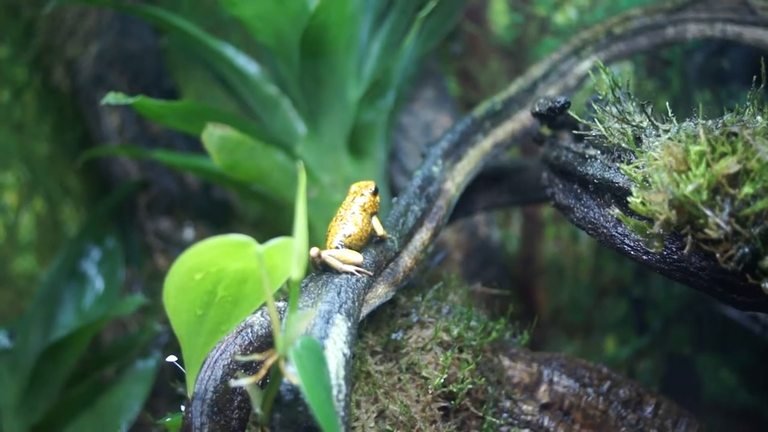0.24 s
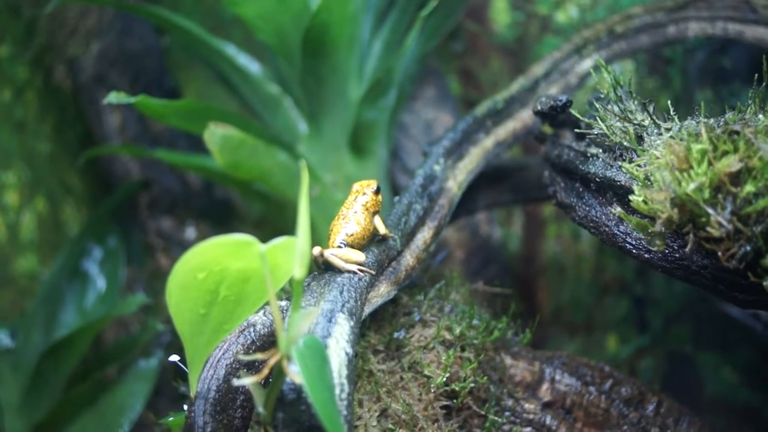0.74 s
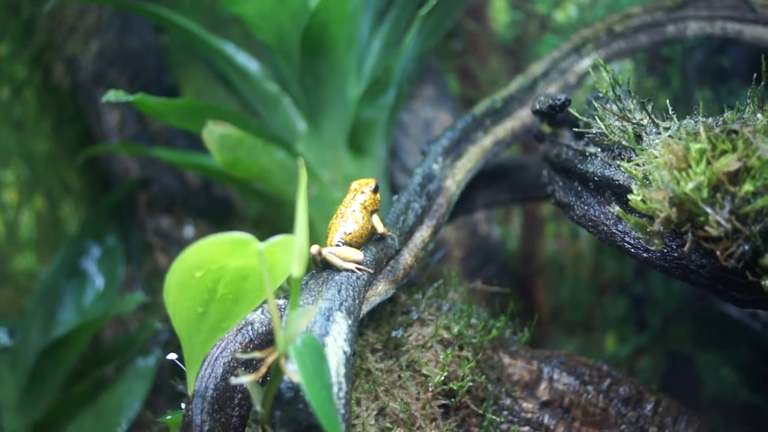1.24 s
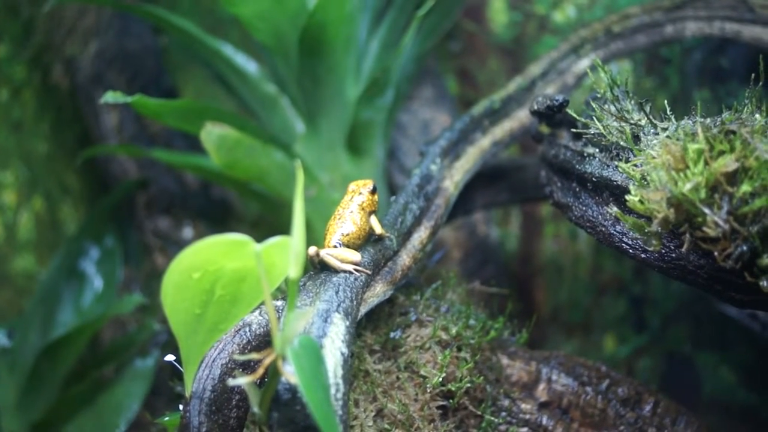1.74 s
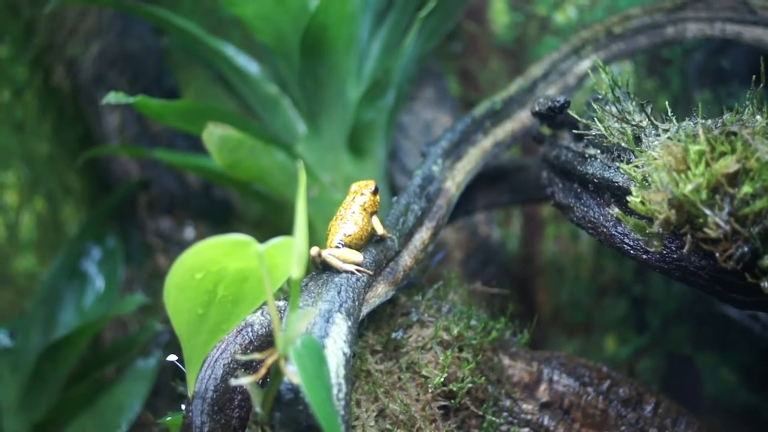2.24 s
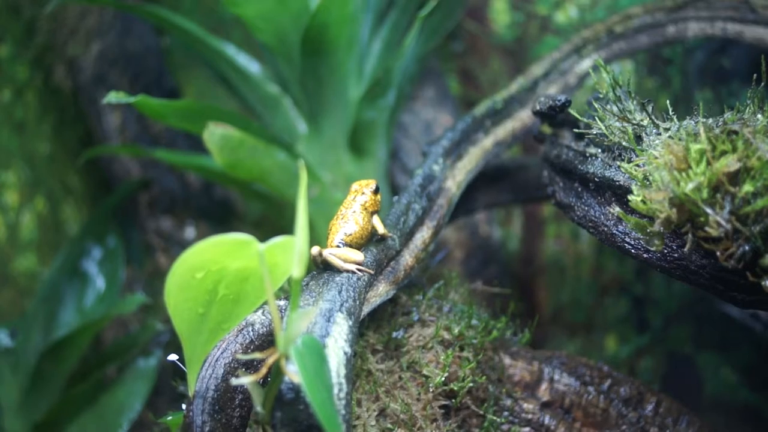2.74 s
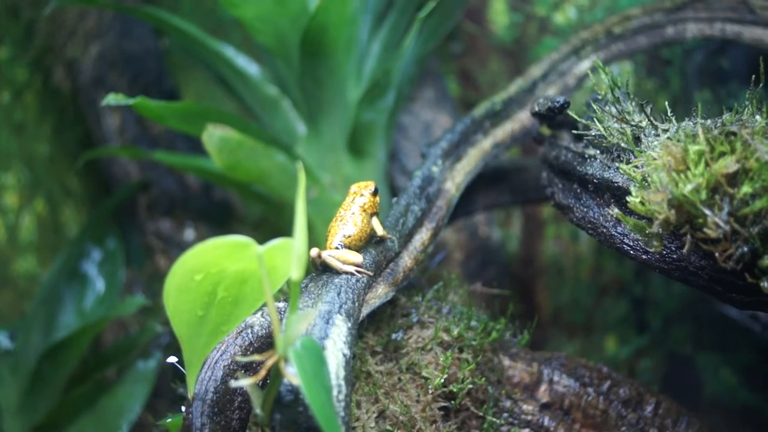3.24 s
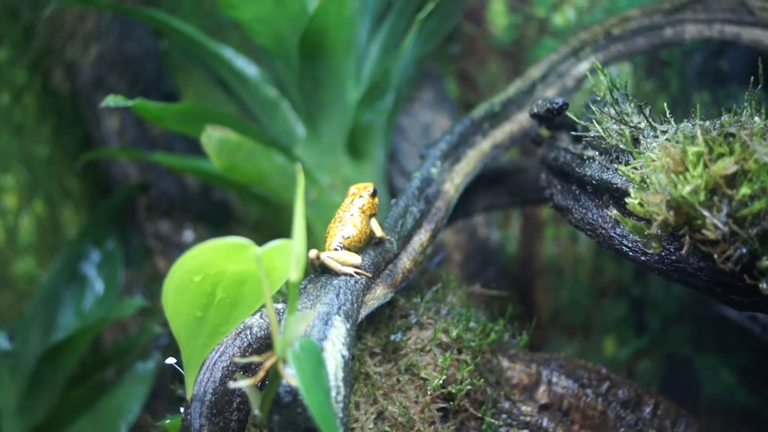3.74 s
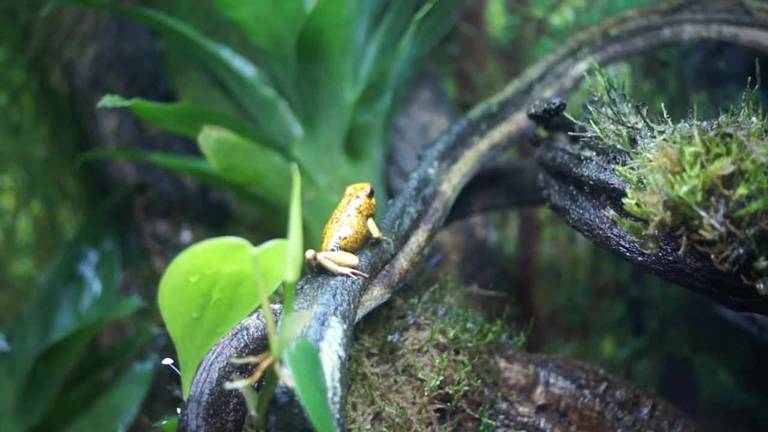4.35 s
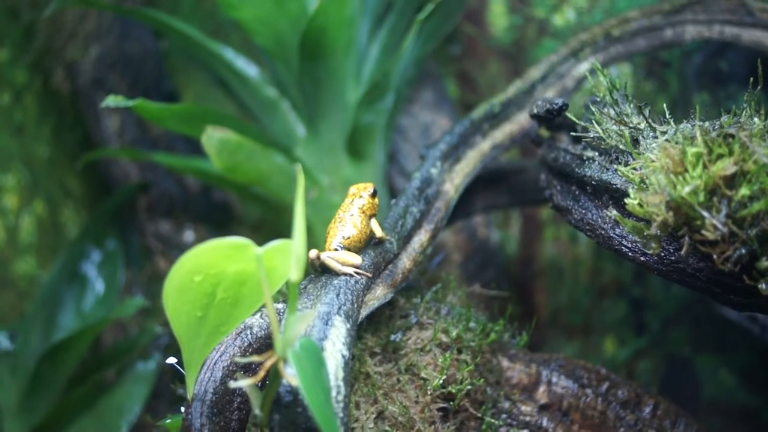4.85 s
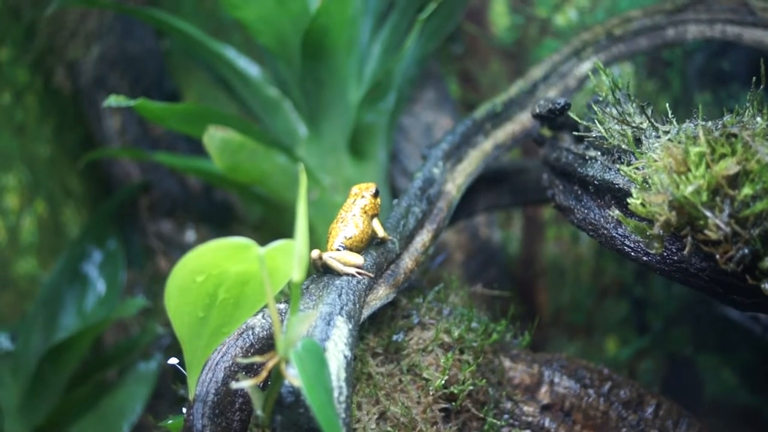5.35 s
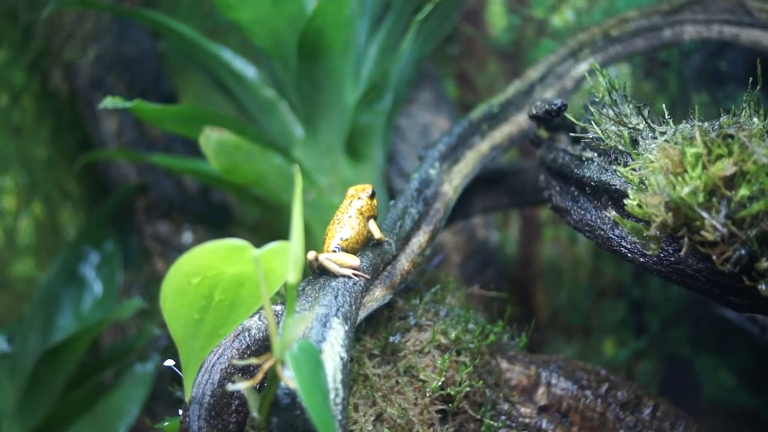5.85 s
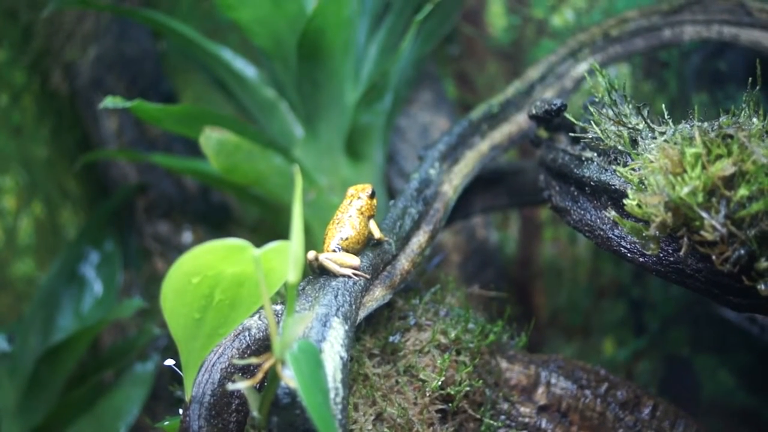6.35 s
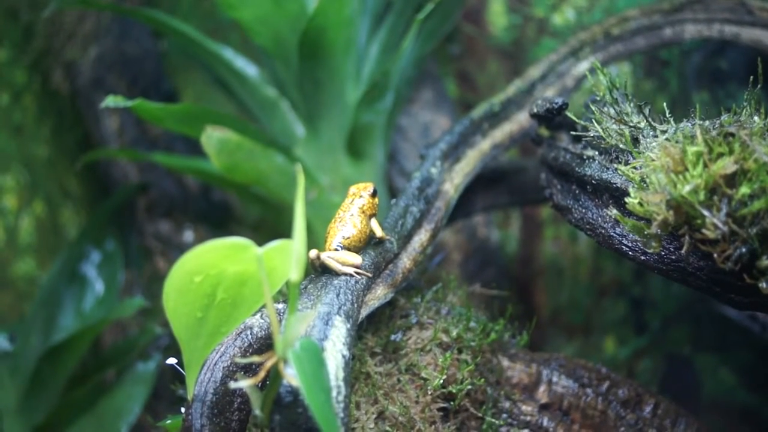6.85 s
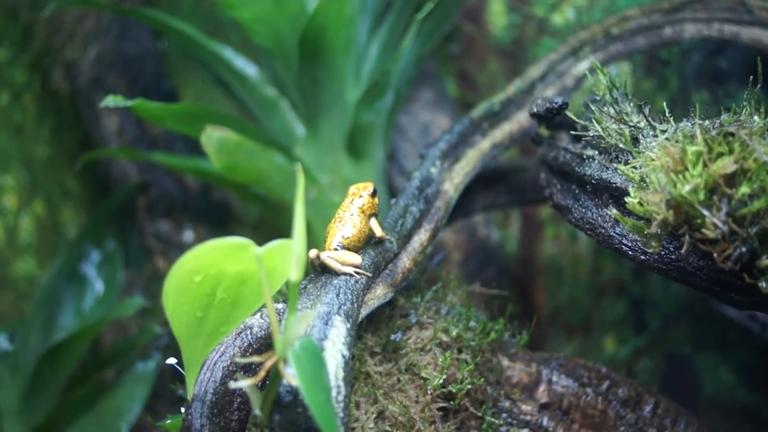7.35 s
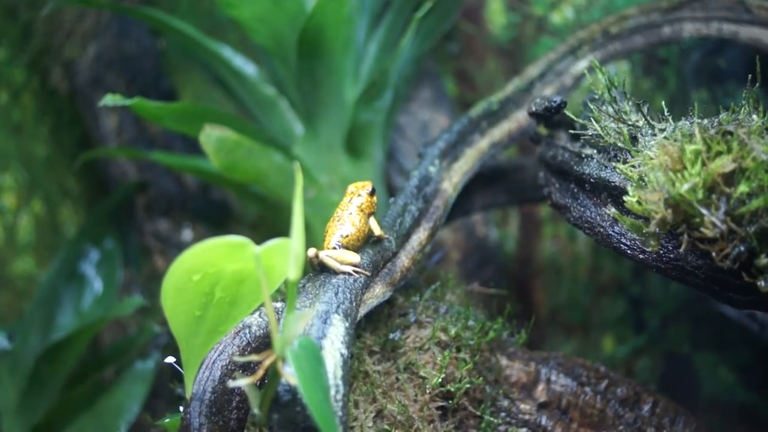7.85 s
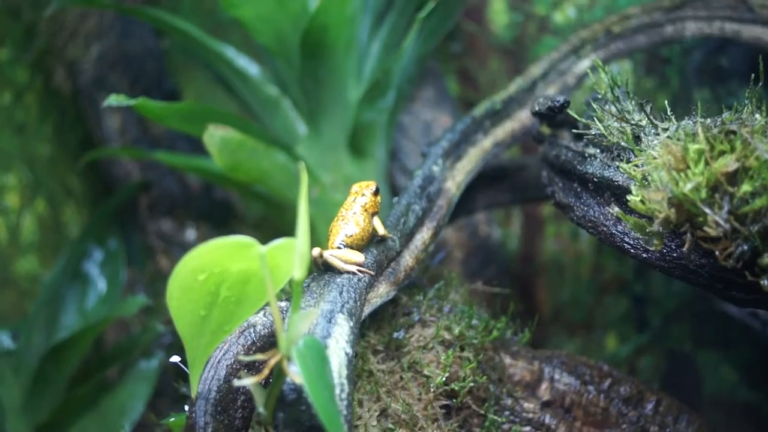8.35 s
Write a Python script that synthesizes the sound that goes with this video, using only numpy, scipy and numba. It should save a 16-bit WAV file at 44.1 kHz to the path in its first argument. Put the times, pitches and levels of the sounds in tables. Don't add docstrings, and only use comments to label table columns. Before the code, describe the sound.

From 0 to about 8.5 seconds a single small frog calls continuously in an indoor glass terrarium, roughly 39 notes, about 4.6 a second, evenly spaced with only tiny irregularities. Each chirp lasts just under 0.1 second: it opens quietly as a grainy pulsed buzz, swells strongly while the pulses quicken, jumps past its middle to a faster, smoother gait, and ends loudest with an abrupt stop. Its main pitch colour climbs from about 2.1 to 2.7 kilohertz, with a thin whistle near 8.5 kilohertz and a light airy rasp. Gaps of just over 0.1 second carry a short, ringing, glassy room tail. The notes grow very slightly louder towards the end, about two decibels. Underneath throughout is a faint, soft fan hush with barely audible low motor hum. Close, quiet stereo pickup with slightly softened extreme treble; the calling never pauses.

```python
import sys
import numpy as np
from scipy import signal
from scipy.fft import rfft, irfft
from scipy.io import wavfile
from scipy.ndimage import uniform_filter1d
from numba import njit

SR = 44100
rng = np.random.default_rng(int(sys.argv[2]) if len(sys.argv) > 2 else 0)


def wav_record(signal):
    frames = np.transpose(np.atleast_2d(signal))
    bounded = np.clip(frames, -1, 1)
    quanta = np.round(bounded * 32767).astype(np.int16)
    wavfile.write(sys.argv[1], SR, quanta)


def convert_level_to_amplitude(level_db):
    exponent = np.asarray(level_db, float) / 20
    return 10 ** exponent


N = 378819

# t/s, notes begun so far/1
PACE = [(-0.066, 0), (0.157, 1), (1.025, 5), (1.451, 7), (2.311, 11), (2.522, 12), (3.173, 15), (5.151, 24),
        (5.575, 26), (5.8, 27), (6.688, 31), (7.979, 37), (8.198, 38), (8.41, 39)]
TANK_HZ = [1010, 1805, 1930, 2088, 2160, 2400, 2505, 2600, 2713, 2899, 3100, 3225, 3290, 3450, 3671, 3830,
           3958, 4155, 4290, 4455, 4570, 4860]
# width/Hz, left level/dB, right level/dB
TANK_MODES = [(160, -9, -0.5), (52, -11, 5), (54, 10.5, 7), (51, 6, 8), (45, 3, 2), (113, -0.5, 1),
              (46.7, 5, 10), (36, 3, 5.5), (21.5, 11.5, -2.5), (40.5, 6, 12.5), (46, 4, 4), (60, -4.5, 2.5),
              (58.4, 2, 2), (69, 1, -2.5), (71, 3, 5.5), (44.4, 2.5, -9), (44.7, -1, 0), (57.6, -11, 1.5),
              (60, -3, -13), (49, -2, -9), (70, -3.5, -5), (360, -16, -13.5)]
NODE_HZ = [2030, 2250, 2660, 3035, 3175, 3385, 3770, 3905, 4230, 4700]
# width/Hz, depth/dB
NODE_DIPS = [(48.3, -28), (47, -10), (40, -7.5), (47, -44), (60, -1), (100, -19), (36, -43), (41, -18),
             (46, -31), (41, -5)]
HIGH_HZ = [8320, 8545, 8740, 8960]
# width/Hz, left level/dB, right level/dB
HIGH_MODES = [(90, -12, 1.5), (60, 6.5, -1), (80.6, -1.5, 11.5), (120, -6, -9)]
# delay/s, level/dB
PANES = [(.0021, -3), (.0052, 5), (.0067, -35), (.0103, -7)]
# f/Hz, T60/s
ROOM_T60 = [(1500, 0.2), (2000, 0.27), (2700, 0.2), (3500, 0.24), (9000, 0.28)]
LINGER_HZ = [2590, 2712]
# width/Hz, left level/dB, right level/dB
LINGER_MODES = [(18, -7, -6), (18, -7, -6)]
# f/Hz, width/Hz, depth/dB
ROOM_NODES = [(2390, 170, 1), (3120, 220, -8.5)]
# f/Hz, level per hertz/dB, left-right likeness/1, left minus right/dB
AIR = [(32.4, -30, .6, -1), (47.2, -7, 0.96, 7), (70.6, -21, -0.5, -11), (129, -9, -0.39, -0.5),
       (418, 1, -0.21, -0.5), (816, -0.5, -0.29, -1), (1227, 2.5, 0.44, -3), (2040, -14, 0, 3),
       (2920, -6.5, 0.5, 0.5), (3210, -18.5, -0.3, -14), (3910, -12, -0.22, 6.5), (4640, -18, -0.15, -1.5),
       (8870, -27, -0.08, -1), (12900, -33, -0.06, 0.5), (15600, -34, 0.1, 1)]
# f/Hz, rms level/dB, width/Hz
HUM = [(159, -79, 8), (199.2, -77, 8), (362, -75, 8), (398.4, -71, 5), (1233, -73, 40)]
# f/Hz, width/Hz, depth/dB
CAMERA_NOTCHES = [(700.5, 198, -36), (1612, 450, -21.5),
                  (9830, 330, -18)]

NOTE_DB, WARMING_DB_PER_S, NOTE_SPREAD_DB = -40.5, 0.2225, 0.59
OPEN_S, SWELL_S, SHUT_S, SWELL_DB, SHUT_DB = 0.0021, 0.086, 0.009, 15.5, 6.5
FLUTTER_PER_S, FLUTTER_S, PULSES_FROM_PER_S, QUICKEN_PER_S2 = 250, 0.007, 145, 1200
GAIT_PER_S, GAIT_AT_S, GAIT_TAKES_S = 315, 0.057, 0.003
SAC_SLACK_HZ, SAC_TIGHT_HZ = 2140, 2680
BUZZ_DB, BUZZ_LOSS_DB = -8, 3
WHISTLE_FROM_HZ, WHISTLE_TO_HZ, WHISTLE_CLIMB_S = 5000, 8570, 0.021
WHISTLE_DB, WHISTLE_LOSS_DB = -16, 10.5
RASP_DB, RASP_OPEN_DB, RASP_OPEN_S, RASP_SHUT_DB, RASP_SHUT_S = -33.5, -8, 0.004, 6, 0.0036


def rms_one(x):
    return x / np.sqrt(np.mean(x ** 2) + 1e-20)


def at_hz(points, hz, column=1):
    points = np.array(points)
    return np.interp(np.log(hz + 1), np.log(points[:, 0]), points[:, column])


def drift(rate):
    knots = rng.standard_normal(N // 64)
    path = np.interp(np.arange(N) * rate / SR, np.arange(len(knots)), knots)
    return uniform_filter1d(path, 64)


@njit
def moving_resonance(x, turn, r):
    y = np.zeros(len(x))
    for i in range(2, len(x)):
        drive = (1 - r * r) / 2 * (x[i] - x[i - 2])
        y[i] = drive + 2 * r * np.cos(turn[i]) * y[i - 1] - r * r * y[i - 2]
    return y


def resonate(x, hz, width_hz):
    turn = 2 * np.pi * hz / SR * np.ones(len(x))
    return moving_resonance(x, turn, np.exp(-np.pi * width_hz / SR))


def resonate_twice(x, hz, width_hz):
    return resonate(resonate(x, hz, width_hz), hz, width_hz)


def modes(x, centres, table):
    total = 0
    for k, (hz, (width_hz, left_db, right_db)) in enumerate(zip(centres, table)):
        strength = convert_level_to_amplitude(np.array([[left_db], [right_db]]))
        total = total + (-1) ** k * strength * resonate(x, hz, width_hz)
    return total


def dips(x, table):
    for hz, width_hz, depth_db in table:
        w, g = 2 * np.pi * hz / SR, convert_level_to_amplitude(depth_db / 2)
        a = np.pi * width_hz / SR * g
        zeros = [1 + a * g, -2 * np.cos(w), 1 - a * g]
        poles = [1 + a / g, -2 * np.cos(w), 1 - a / g]
        x = signal.lfilter(zeros, poles, x)
    return x


def note_starts():
    s, begun = np.transpose(PACE)
    return np.interp(np.arange(begun[-1] + 1), begun, s) - 0.002


def note_controls():
    t, start = np.arange(N) / SR, note_starts()
    level_db = NOTE_DB + WARMING_DB_PER_S * start + NOTE_SPREAD_DB * rng.standard_normal(len(start))
    k = np.clip(np.searchsorted(start, t) - 1, 0, len(start) - 1)
    age = t - start[k]
    swell = np.clip(age / SWELL_S, 0, 1)
    shut = np.clip((age - SWELL_S) / SHUT_S, 0, 1)
    effort = convert_level_to_amplitude(level_db[k] - SWELL_DB * (1 - swell) - SHUT_DB * shut)
    effort = effort * (shut < 1) * np.clip(0.5 + age / OPEN_S, 0, 1)

    slow = PULSES_FROM_PER_S + QUICKEN_PER_S2 * age + FLUTTER_PER_S * np.exp(-age / FLUTTER_S)
    pace = slow + (GAIT_PER_S - slow) / (1 + np.exp((GAIT_AT_S - age) / GAIT_TAKES_S))
    effort = effort * np.sqrt(GAIT_PER_S / pace)

    sac_hz = SAC_SLACK_HZ + (SAC_TIGHT_HZ - SAC_SLACK_HZ) * swell
    buzz_db = BUZZ_DB - BUZZ_LOSS_DB * swell
    whistle_hz = WHISTLE_TO_HZ - (WHISTLE_TO_HZ - WHISTLE_FROM_HZ) * np.exp(-age / WHISTLE_CLIMB_S)
    whistle_db = WHISTLE_DB - WHISTLE_LOSS_DB * swell
    opening_db = RASP_OPEN_DB * np.exp(-age / RASP_OPEN_S)
    shutting_db = RASP_SHUT_DB * np.exp(np.minimum(age - SWELL_S, 0) / RASP_SHUT_S)
    return effort, pace, sac_hz, buzz_db, whistle_hz, whistle_db, RASP_DB + opening_db + shutting_db


def larynx(per_s, jitter, puff_s, puff_db, uneven_db):
    cycles = np.cumsum(per_s * (1 + jitter * drift(150))) / SR
    starts = np.ceil(note_starts() * SR + 1).clip(0).astype(int)
    cycles -= cycles[starts][np.searchsorted(starts, np.arange(N), "right") - 1]
    opened = np.diff(np.floor(cycles), prepend=0) != 0
    clicks = opened * convert_level_to_amplitude(uneven_db * rng.standard_normal(N))
    gate = signal.lfilter([1], [1, -np.exp(-1 / (puff_s * SR))], clicks)
    return rms_one(clicks + convert_level_to_amplitude(puff_db) * gate * rng.standard_normal(N))


def vocal_sac(air, sac_hz, buzz_db):
    return resonate(air, sac_hz, 516) + convert_level_to_amplitude(buzz_db) * air


def tank(sac, whistle):
    low = dips(modes(sac, TANK_HZ, TANK_MODES), np.c_[NODE_HZ, NODE_DIPS])
    return convert_level_to_amplitude(15) * low + convert_level_to_amplitude(15) * modes(whistle, HIGH_HZ, HIGH_MODES)


def panes(x):
    echoes = []
    for late in range(2):
        echoes.append(sum(convert_level_to_amplitude(level_db) * np.roll(x, round(s * SR) + late * k)
                          for k, (s, level_db) in enumerate(PANES)))
    return x + np.array(echoes)


def room(x):
    size = SR // 2
    t, tail = np.arange(size) / SR, 0
    white = rng.standard_normal((2, size))
    for low in np.arange(800, 10000, 400):
        sos = signal.butter(2, [low, low + 400], "band", fs=SR, output="sos")
        tail = tail + signal.sosfilt(sos, white) * convert_level_to_amplitude(-60 * t / at_hz(ROOM_T60, low + 200))
    tail *= np.clip(t / 0.011, 0, 1)
    tail *= convert_level_to_amplitude(-6) / np.sqrt(np.sum(tail ** 2, axis=1, keepdims=True) * SR / 2 / 9200)
    heard = x.mean(axis=0)
    diffuse = signal.fftconvolve(heard[None], tail, axes=1)[:, :N]
    wall = np.roll(resonate_twice(heard, 2660, 180), round(0.034 * SR)) * convert_level_to_amplitude(-9)
    return diffuse + wall * convert_level_to_amplitude([[1.5], [-1.5]]) + modes(heard, LINGER_HZ, LINGER_MODES)


def frog():
    effort, pace, sac_hz, buzz_db, whistle_hz, whistle_db, rasp_db = note_controls()
    air = effort * larynx(pace, jitter=0.05, puff_s=0.0025, puff_db=-23, uneven_db=1.0)
    sac = vocal_sac(air, sac_hz, buzz_db)
    whistle = resonate_twice(air * convert_level_to_amplitude(whistle_db), whistle_hz, 1250)
    overtone = resonate_twice(air * convert_level_to_amplitude(whistle_db), 13450, 900)
    rasp = resonate_twice(air * convert_level_to_amplitude(rasp_db), 5970, 2500)
    near = tank(sac, whistle)
    near = near + panes(convert_level_to_amplitude(7.5) * whistle + convert_level_to_amplitude(12.5) * rasp + convert_level_to_amplitude(-6.5) * overtone)
    return near + dips(room(near), ROOM_NODES)


def fan():
    hz = np.arange(N // 2 + 1) * SR / N
    alike = np.clip(at_hz(AIR, hz, column=2), -1, 1)
    mid, side = rfft(rng.standard_normal((2, N))) * convert_level_to_amplitude(at_hz(AIR, hz))
    pan = convert_level_to_amplitude(at_hz(AIR, hz, column=3) / 2 * np.array([[1], [-1]]))
    spectrum = pan * (np.sqrt(1 + alike) * mid + np.sqrt(1 - alike) * side * [[1], [-1]])
    out = convert_level_to_amplitude(-50.5 + 0.5 * drift(2.87)) * rms_one(irfft(spectrum, N))
    for line_hz, level_db, width_hz in HUM:
        line = resonate_twice(rng.standard_normal(N), line_hz, width_hz)
        out += convert_level_to_amplitude(level_db) * rms_one(line)
    return out


def scene():
    return frog() + dips(fan(), ROOM_NODES)


def thin_treble(x):
    loudness_db = 10 * np.log10(uniform_filter1d(np.mean(x ** 2, axis=0), 1500) + 1e-12)
    for low_hz, high_hz, share, from_db in [(9450, 10300, 0.85, -46), (14300, 15200, 0.6, -46),
                                            (15200, 17000, 0.8, -53)]:
        weakened = np.clip((loudness_db - from_db) / 6, 0, 1)
        sos = signal.butter(3, [low_hz, high_hz], "band", fs=SR, output="sos")
        x = x - share * weakened * signal.sosfiltfilt(sos, x)
    return x


def band_limit(x):
    return signal.sosfilt(signal.butter(12, 15700, fs=SR, output="sos"), x)


def record(dry):
    notched = dips(dry, CAMERA_NOTCHES)
    mix = thin_treble(notched)
    return band_limit(mix)


dry = scene()
out = record(dry)
wav_record(out)
```